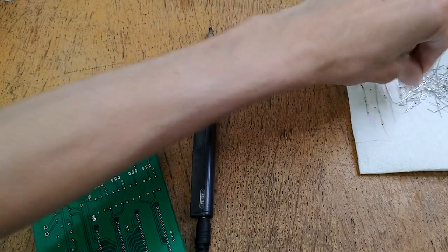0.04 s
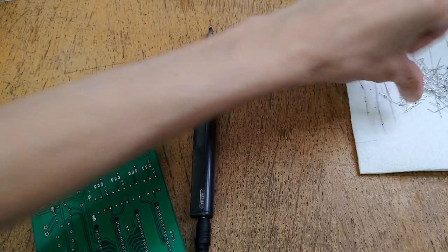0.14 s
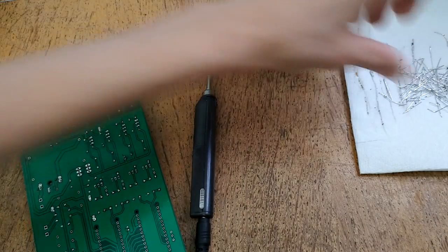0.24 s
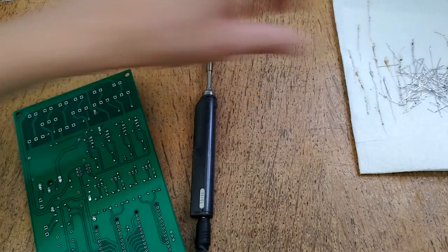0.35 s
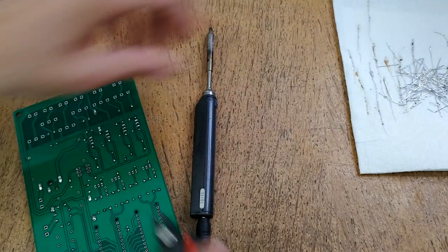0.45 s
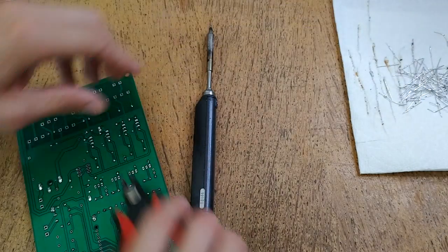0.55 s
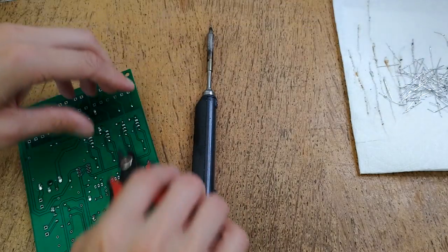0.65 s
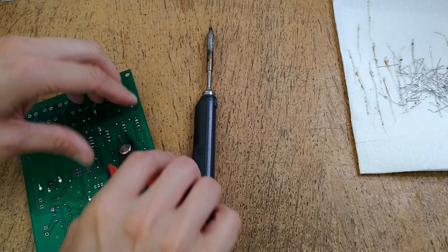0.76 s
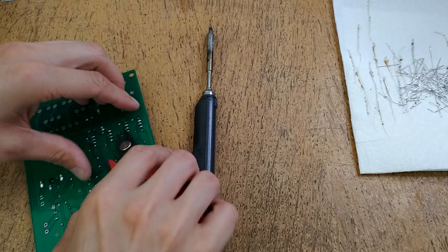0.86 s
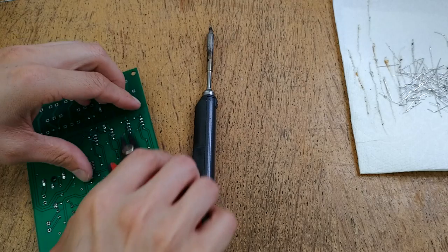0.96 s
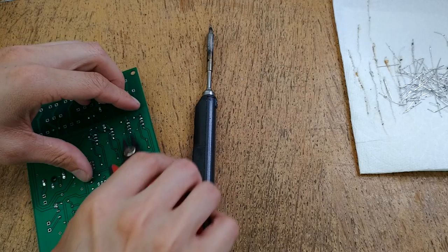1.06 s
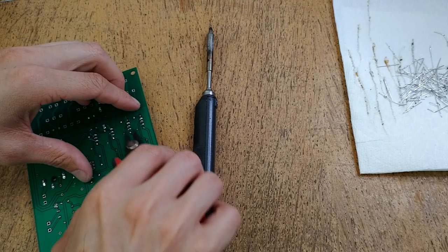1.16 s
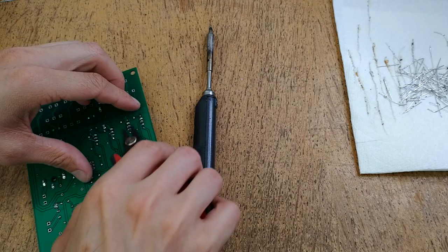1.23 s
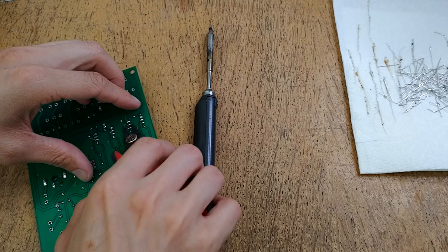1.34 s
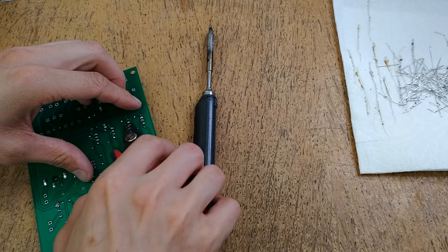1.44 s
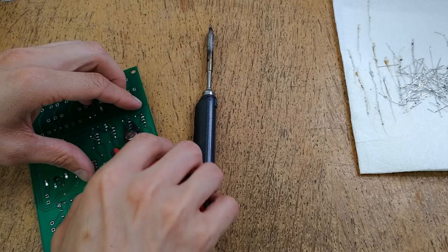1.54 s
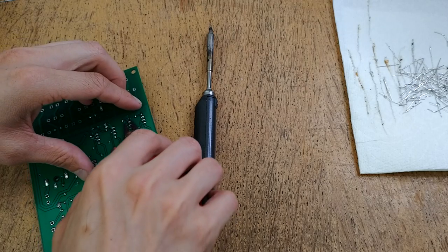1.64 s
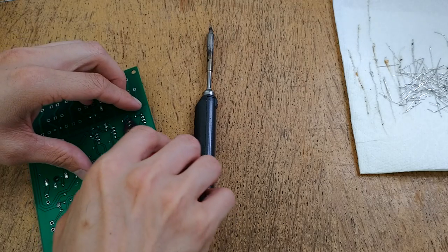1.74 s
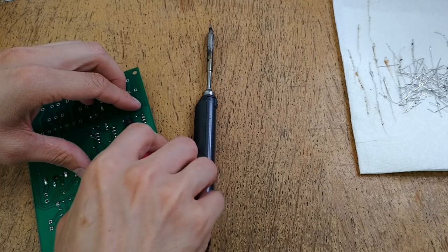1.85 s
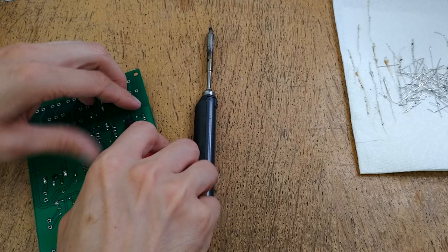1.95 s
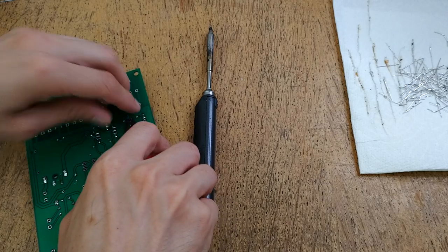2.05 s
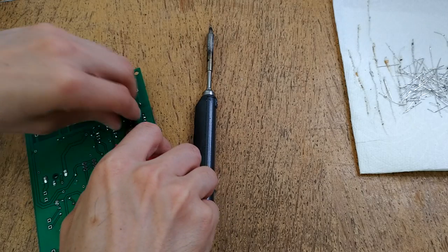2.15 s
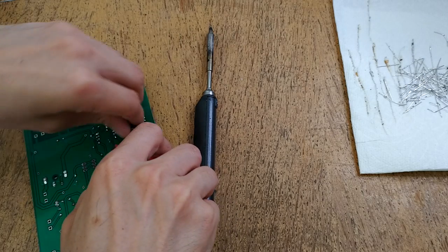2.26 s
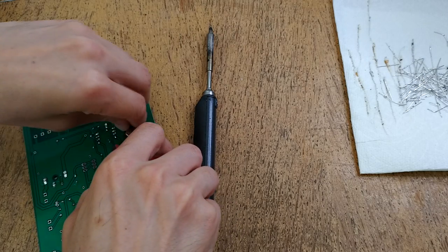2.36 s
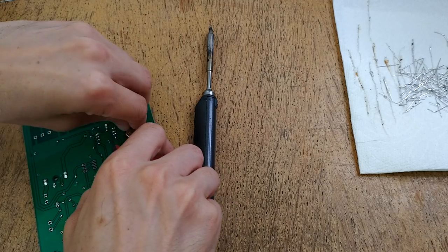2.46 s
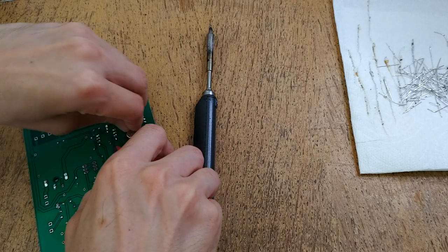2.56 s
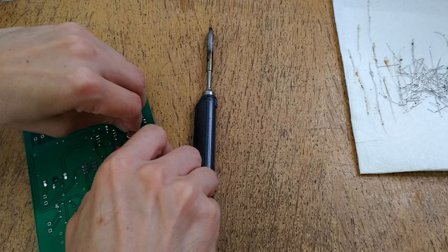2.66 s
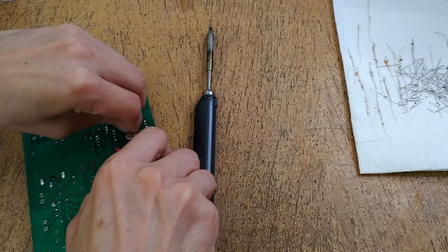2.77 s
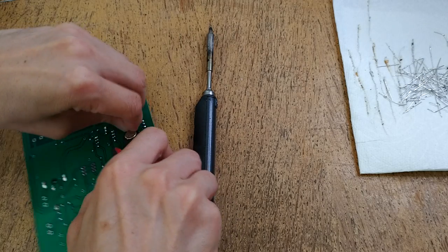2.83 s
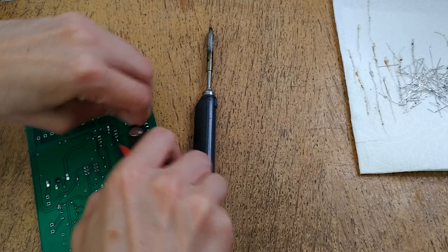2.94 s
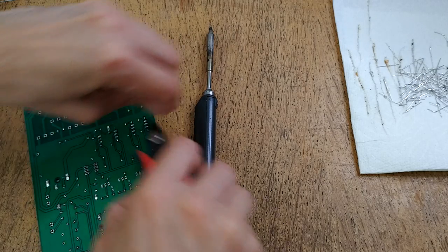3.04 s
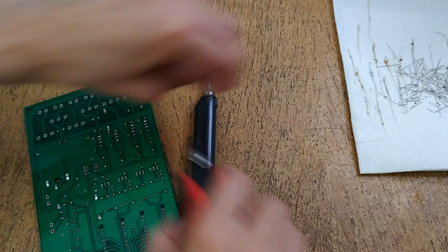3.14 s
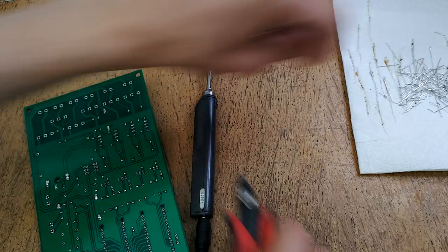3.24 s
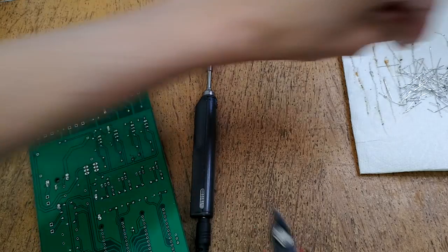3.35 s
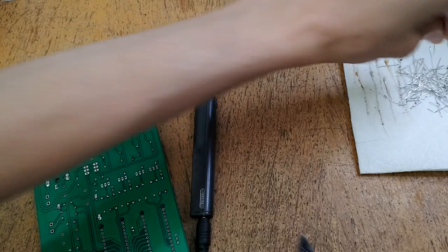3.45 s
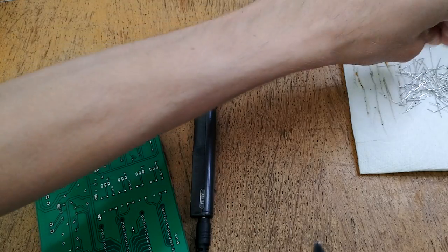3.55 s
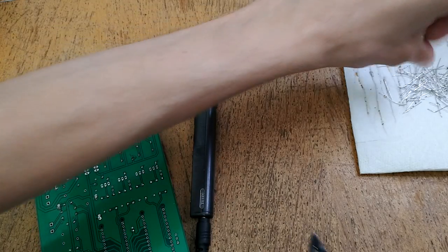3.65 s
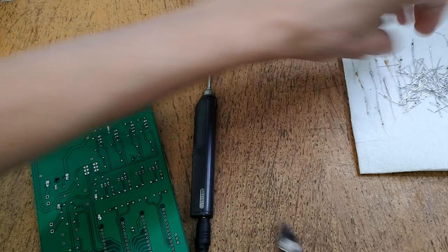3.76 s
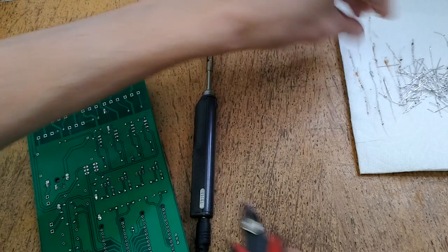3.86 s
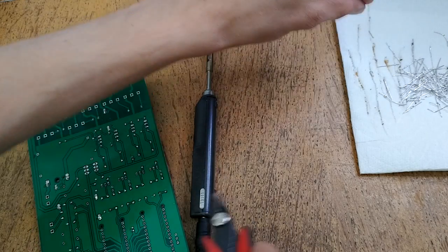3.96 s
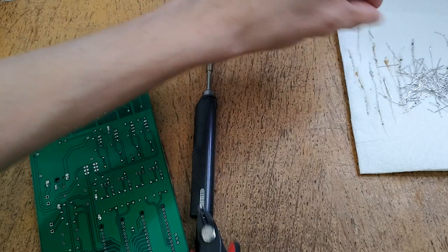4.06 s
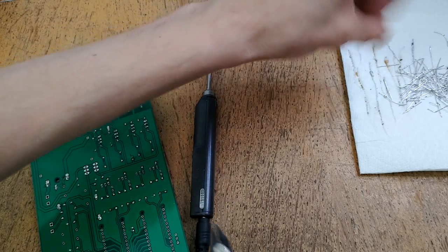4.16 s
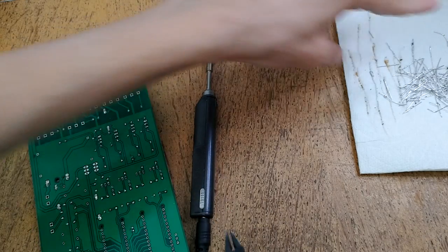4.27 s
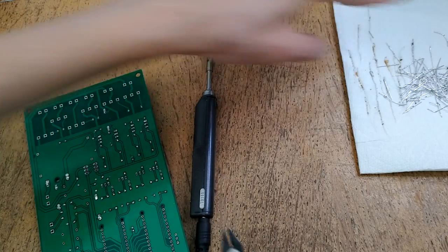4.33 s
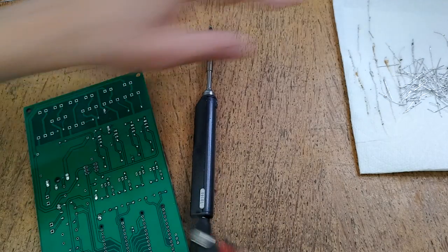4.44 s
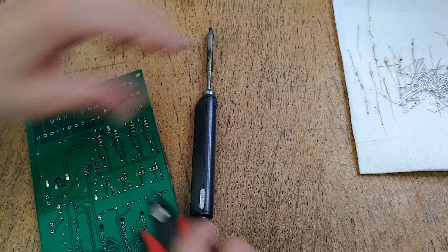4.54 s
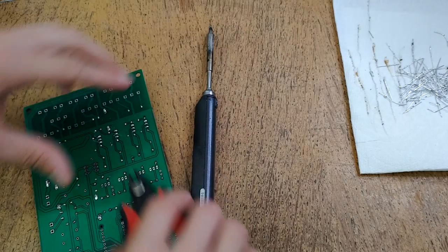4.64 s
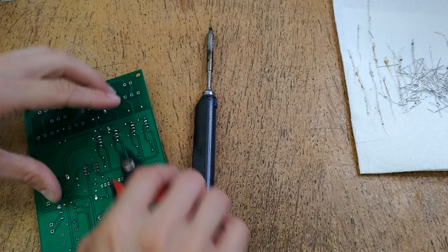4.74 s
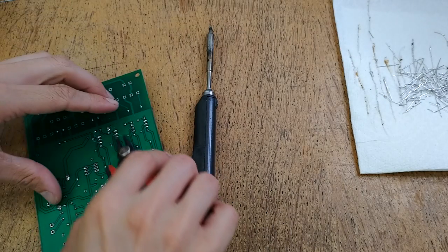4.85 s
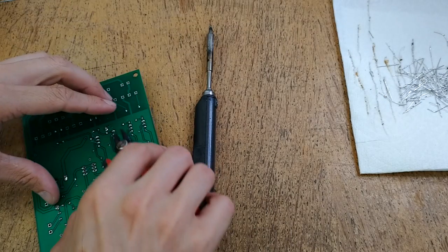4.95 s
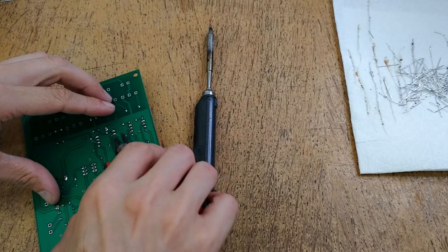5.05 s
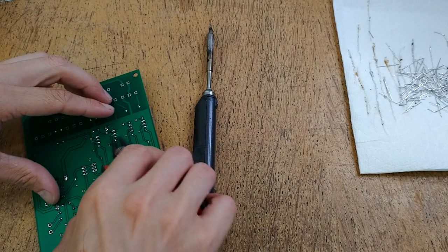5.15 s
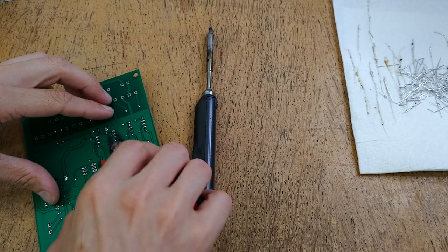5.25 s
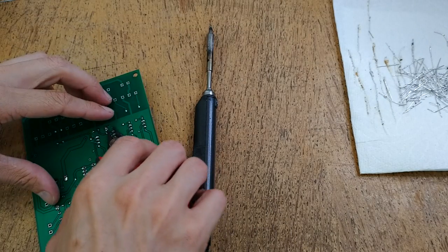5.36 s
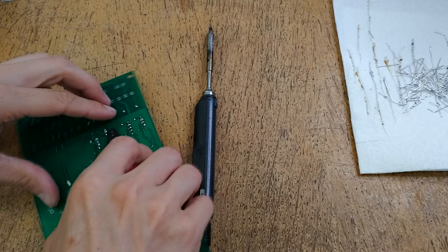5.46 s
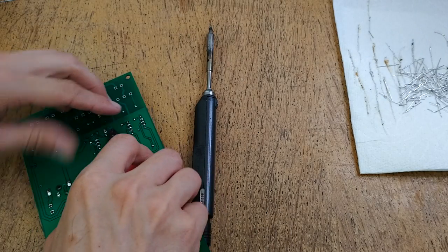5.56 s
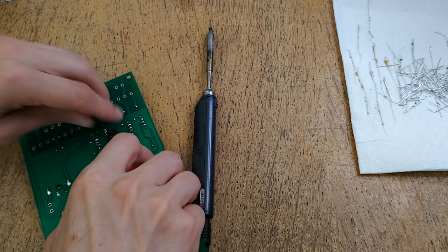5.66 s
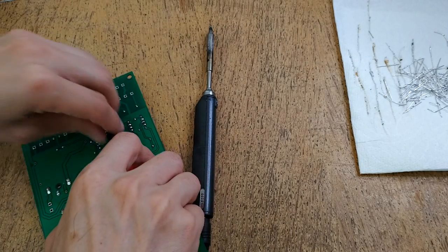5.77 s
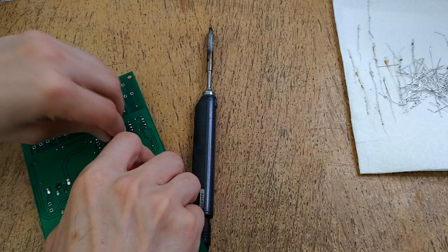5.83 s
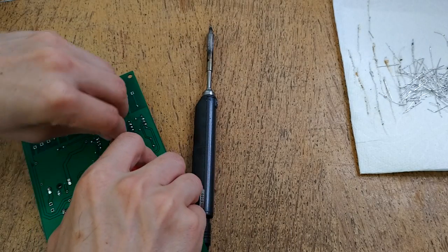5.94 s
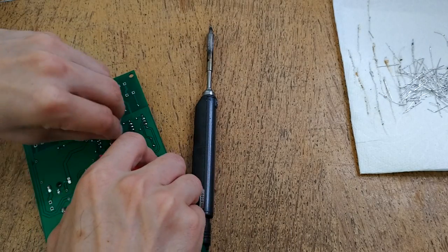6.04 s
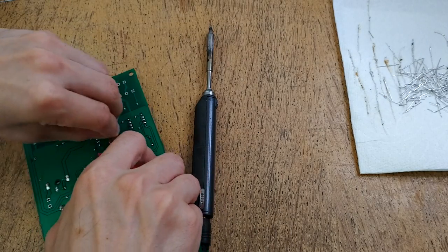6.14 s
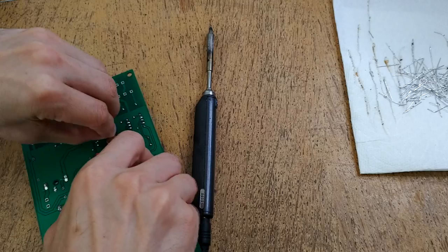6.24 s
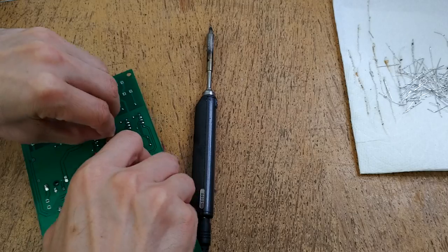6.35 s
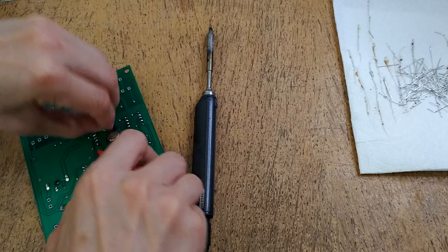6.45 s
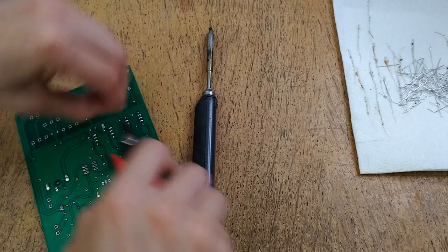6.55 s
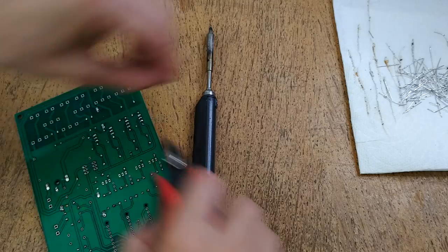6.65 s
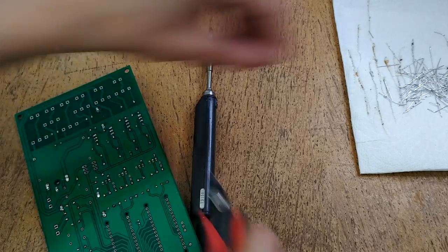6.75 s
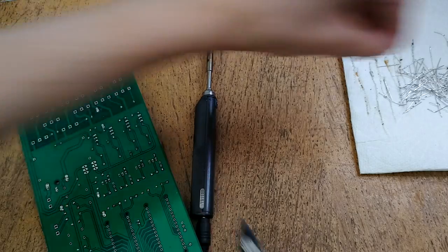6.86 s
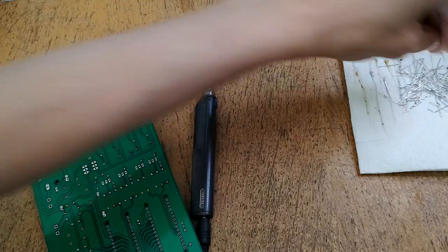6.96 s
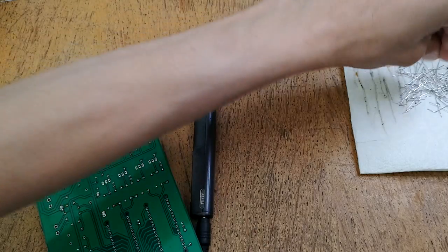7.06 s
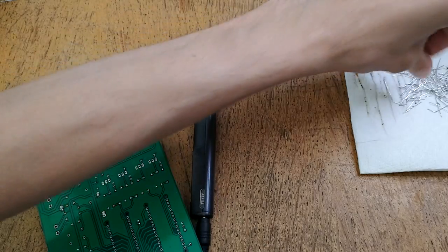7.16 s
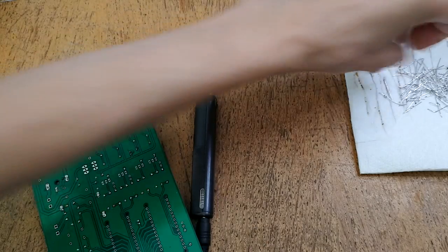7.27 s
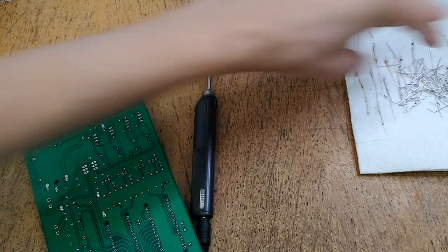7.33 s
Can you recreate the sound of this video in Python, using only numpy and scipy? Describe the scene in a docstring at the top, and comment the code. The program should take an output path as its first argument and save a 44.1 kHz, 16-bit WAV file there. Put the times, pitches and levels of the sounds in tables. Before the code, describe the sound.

Crisp metallic clips and rattling bounces on a wooden bench, light jaw ticks and finger rustles between, over a soft mains hum.

```python
"""Snipping leads off a circuit board

Flush cutters snip wires on a wooden bench: bursts of force ring the steel, the hollow under the board and
the board itself, which springs back and clatters. Between cuts the jaws tick on solder joints.
Fingers rub cut wires over paper, made of dense random slips; faint narrow tones of filtered noise ring and fade.
Wavering motor and mains tones and a soft noise of air and hiss lie behind, in a small echoing room."""
import sys
import numpy as np
from scipy import signal
from scipy.io import wavfile

SR = 44100
rng = np.random.default_rng(int(sys.argv[2]) if len(sys.argv) > 2 else 0)


def wav_out(sig):
    """Save sig, one row per channel (or a flat mono array), as 16-bit PCM at SR to the path in sys.argv[1]."""
    wavfile.write(sys.argv[1], SR, np.round(np.clip(np.atleast_2d(sig).T, -1, 1) * 32767).astype(np.int16))


N = 326340   # length in samples

# Room air and microphone hiss. Each row: frequency in Hz, relative level in dB per Hz.
AIR = [(25, -24.5), (45, -18), (80, -6.5), (140, 5), (230, -1.5), (330, -9.5), (700, -12.5), (1300, -18.5),
       (2300, -22), (3300, -31.5), (5000, -32), (7500, -27), (10000, -38.5), (15000, -38)]
AIR_DB = -57.5   # overall level
CUTOFF_HZ = 16350   # from here up the sound is at least 60 dB down

# Motor and mains tones, one entry per tone: frequency in Hz, middle level in dB rms, spread of the waver in dB.
HUM_HZ = [29.39, 51.89, 58.78, 117.57, 120.0, 137.3, 176.3, 235.14, 374.3]
HUM_DB = [-79, -66, -64.5, -74, -55, -60, -75.5, -70.5, -74.5]
HUM_WAVER_DB = [.7, 1, .6, .7, 0.73, 3, 1.2, 1.2, 0.66]

# How the room dies away. Each row: frequency in Hz, time to fall 60 dB in seconds, level in dB before WET_DB.
ROOM_DECAY = [(254.7, 0.67, -17), (600, 0.8, -17), (1380, 0.36, -15.5), (2500, 0.61, -15),
              (5200, 0.44, -22), (9250, 0.21, -28), (15130, 0.068, -21.5)]
EARLY_T60_S, EARLY_DB = 0.22, 2.5   # dense reflections off nearby surfaces, level against the tail
WET_DB = -15   # level of the whole room response
BENCH_ECHO_S, BENCH_ECHO_DB = 0.0042, -8

# Resonances of each part. Each row: frequency in Hz, width in Hz, level in dB against the other rows.
WIRE_MODES = [(5430, 400, -5.5), (6100, 780, -4), (6850, 310, 2), (7800, 360, 0.5), (8000, 280, 0)]
FINGER_MODES = [(9400, 2200, 2.5), (11700, 900, -7.5), (12245, 900, -7), (14430, 2700, -1)]
JAW_MODES = [(3420, 1400, -4), (4180, 350, 2.5), (5234, 270, -3.5)]
STEEL_MODES = [(6085, 450, -9), (6870, 390, -3.5), (8310, 670, 2), (8680, 360, -2.5), (9407, 360, -3.5)]
EDGE_MODES = [(10800, 990, 1), (12000, 900, -1.5), (12400, 1400, -1.5), (15360, 3300, -5.5)]
HOLLOW_MODES = [(1947, 190, 3.5), (2250, 200, -3.5), (2428, 200, -12.5)]
KNOCK_MODES = [(1090, 120, -3), (1321.6, 93, 1), (1518, 65, 0), (1816, 120, -3)]
BOARD_MODES = [(247.4, 23, -2.5), (290, 55, -2), (375, 55, 1), (567, 29, 0), (680, 35, -4.5),
               (834, 29, -2.5)]
# Slender parts of the cutter that ring on after a touch.
# Each row: frequency in Hz, width in Hz, level in dB against the snap.
PING_MODES = [(2030, 44, -27.5), (2620, 60, -25), (4280, 92, -34.5), (5020, 60, -32), (5320, 190, -30),
              (6440, 70, -26.5), (6500, 130, -27.5), (7100, 220, -30), (7810, 64, -21.5),
              (8350, 170, -22.5), (8830, 88, -24.5), (9920, 100, -24.5)]

# Strokes of the hands. Each row: loudest moment in seconds, fading time in seconds, then the levels in dB
# of wire on paper, fingertips, and dragging jaws and board.
STROKES = [(0.15, 0.033, -64, -80, -81), (0.198, 0.053, -70, -62.5, -78), (0.295, 0.017, -63.5, -71, -83),
           (0.99, 0.016, -63, -84, -78), (1.046, 0.05, -66.5, -76, -78), (1.46, 0.18, -73, -92, -74),
           (1.614, 0.04, -70, -91, -78), (1.75, .1, -84, -92, -77.5), (2.42, 0.025, -79, -79, -69),
           (2.755, 0.039, -66, -81, -62), (3.331, .15, -67, -88.5, -62), (3.5, 0.12, -65.5, -80.5, -70),
           (3.614, 0.037, -56, -62.5, -80), (3.747, .05, -65, -54.5, -85), (3.8, 0.047, -68.5, -81, -79),
           (3.908, .04, -71, -78, -79.5), (4.234, 0.046, -84, -74.5, -81.5), (4.338, .05, -67, -71, -82.5),
           (5.014, 0.15, -60, -73, -63.5), (5.188, 0.031, -67.5, -83.5, -81), (5.42, 0.046, -75, -80, -72),
           (5.498, .03, -66.5, -81.5, -60.5), (5.623, 0.035, -54.5, -60.5, -68),
           (5.646, 0.012, -63, -54.5, -59.5), (5.7, .15, -72, -86, -78), (6.8, 0.3, -73.5, -84, -72),
           (7.108, 0.046, -67, -63, -82.5), (7.228, 0.03, -71, -63.5, -80), (7.282, 0.084, -70, -61, -70)]
RUB_FADE_DB, RUB_RISE_S = -21.5, 0.018   # level lost over the fading time; the swell climbs as much in RUB_RISE_S
RUB_FLUTTER_DB, SLIP_SPREAD_DB = 2.5, 2.5   # unevenness of the pressure, and of single slips
DRAG_PING_DB = -7   # dragging also sets the slender parts ringing

# Faint narrow-band tones that start quickly and fade. Each row: start in seconds,
# time to lose 20 dB in seconds, frequency in Hz, level in dB rms before the swell and fade.
FAINT_TONES = [(1.096, 0.04, 1180, -59), (2.49, 0.04, 680, -55), (3.444, 0.22, 2390, -65),
               (3.446, 0.17, 2720, -66), (3.464, .4, 3730, -72.5), (3.455, 0.27, 4880, -64.5),
               (3.46, 0.15, 6100, -63), (3.445, 0.15, 7150, -62.5), (4.261, 0.28, 3970, -76),
               (4.394, 0.13, 2250, -69.5), (4.993, 0.17, 5320, -70), (5.073, 0.037, 4280, -62),
               (5.076, 0.059, 1090, -55), (5.157, 0.079, 1700, -65), (5.428, 0.19, 1240, -60),
               (7.138, 0.21, 4110, -72), (7.162, 0.094, 600, -56), (7.25, 0.15, 890, -57),
               (7.249, 0.03, 1700, -52)]
FAINT_TONE_WIDTH_HZ, FAINT_TONE_RISE_S = 65, 0.008

# The jaws tick on solder joints.
# Each row: start in seconds, steel snap in dB before TICK_SNAP_DB, hollow ring in dB.
TICKS = [(0.974, -47.5, -57), (1.089, -55, -44), (1.117, -46, -47), (1.612, -57, -55), (1.633, -66, -48.5),
         (1.682, -64, -59), (1.741, -70, -60), (1.952, -38, -59), (2.038, -55, -71.5), (2.392, -41.5, -52),
         (2.403, -48, -55), (2.625, -37.5, -41.5), (2.733, -50, -46.5), (4.976, -48.5, -59.5),
         (4.992, -52, -54), (5.007, -43, -44), (5.03, -45.5, -39.5), (5.053, -54.5, -48.5),
         (5.095, -46.5, -62), (5.116, -59, -62), (5.191, -58, -61), (5.497, -54.5, -54.5),
         (6.052, -46, -54.5), (7.258, -70.5, -51.5)]
# Cutter and board bounce and clatter on the bench.
# Each row: start in seconds, then the peaks of steel snap, hollow ring and board thud in dB.
BOUNCES = [(1.36, -33.5, -38.5, -36), (1.433, -73, -45, -64), (2.8826, -11, -33, -32.5),
           (3.0025, -31, -32.5, -56), (3.039, -18.5, -8, -20.5), (3.043, -15, -32, -26),
           (3.065, -9.5, -24, -23.5), (3.069, -16, -37, -29.5), (3.088, -32, -12.5, -26.5),
           (3.1, -16.5, -34, -30), (3.106, -16.5, -25, -38), (3.126, -33, -26, -31.5),
           (3.131, -28, -44, -42), (3.149, -23.5, -28.5, -38.5), (3.166, -44, -27.5, -35),
           (3.172, -54, -28, -47), (3.182, -57, -31.5, -42), (6.447, -10.5, -40, -35),
           (6.5552, -24, -24, -29.5), (6.5659, -11, -40, -42), (6.571, -9.5, -45, -27.5),
           (6.581, -43, -25, -34), (6.5884, -39, -20, -27), (6.594, -42, -26, -36), (6.6, -23, -37, -34.5),
           (6.604, -21, -35, -30.5), (6.622, -44, -32.5, -32.5)]
# The jaws bite through wire. Each row: start in seconds, then the peaks of steel snap, hollow ring and
# board thud in dB, length in milliseconds, jaw clack in dB, knock in dB.
SNIPS = [(1.322, -25.5, -25, -37.5, 5, -34, -40.5), (2.8614, -5.5, -16, -35.5, 2.3, -18.5, -28),
         (5.337, -23.5, -27, -35, 4.3, -39, -32), (6.4294, -4.5, -16, -35, 2.4, -15.5, -29.5)]
BOUNCE_MS, TICK_MS = 1.4, 2.3   # set how long the force lasts
TICK_THUD_DB = -10.5   # a tick barely moves the board: thud against hollow ring
TICK_PING_DB, TICK_SNAP_DB = 3.5, -3   # a light tick is more ring than snap

# Colour of a contact. Each list: level in dB for a bounce, a tick and, in the edge list only, a snip.
CLACK_UNDER_SNAP_DB = [-21, -17]
CLACK_UNDER_RING_DB = [-16.5, -16.5]
EDGE_UNDER_SNAP_DB = [-10, -19, -9.5]
KNOCK_DB, KNOCK_FOLLOWS_RING = [1, -5.5], 0.51   # the knock is set between ring and thud, then shifted


def amp(db):
    """Turn decibels into a plain gain."""
    return 10 ** (np.asarray(db) / 20)


def rms_one(x):
    """Scale a sound to an average strength (rms) of 1."""
    return x / np.sqrt(np.mean(x ** 2) + 1e-20)


def at_hz(table, hz):
    """Read the columns of a table at one frequency, between rows on a log-frequency axis."""
    f, *columns = np.transpose(table)
    return [np.interp(np.log(hz), np.log(f), column) for column in columns]


def drift(rate_hz):
    """Slow random wandering of spread 1: smoothed noise made at every 40th sample, then filled in."""
    r = np.exp(-2 * np.pi * rate_hz / (SR / 40))
    noise = rng.standard_normal(N // 40 + 4002)
    slow = signal.lfilter([1], [1, -2 * r, r * r], noise)[4000:]   # skip the filter's start
    return np.interp(np.arange(N) / 40, np.arange(len(slow)), rms_one(slow - slow.mean()))


def body(x, modes):
    """A solid part shaken by x: resonances side by side, with alternating signs."""
    out = 0
    for k, (hz, width_hz, level_db) in enumerate(modes):
        r = np.exp(-np.pi * width_hz / SR)   # a narrower resonance rings longer
        poles = [1, -2 * r * np.cos(2 * np.pi * hz / SR), r * r]
        zeros = [(1 - r * r) / 2, 0, (r * r - 1) / 2]
        ring = signal.lfilter(zeros, poles, x + 1e-18)
        out = out + (-1) ** k * amp(level_db) * ring
    return out


def soften(x, edge_hz):
    """A soft contact loses the treble above its edge frequency."""
    return signal.sosfilt(signal.butter(2, edge_hz, fs=SR, output="sos"), x)


def bands(length):
    """Third-octave bands of white noise, neighbours unrelated: pairs of centre in Hz and noise."""
    edges = 20 * 2 ** (np.arange(30) / 3)
    white = rng.standard_normal((2, length))
    for k, (low, high) in enumerate(zip(edges, edges[1:])):
        sos = signal.butter(2, [low, high], "band", fs=SR, output="sos")
        yield np.sqrt(low * high), signal.sosfilt(sos, white[k % 2])


def air():
    """Room air and hiss: smooth noise, each band flickering a little."""
    out = 0
    for hz, noise in bands(N):
        level_db = at_hz(AIR, hz)[0]
        out = out + noise * amp(level_db + 0.8 * drift(6))
    return amp(AIR_DB) * rms_one(out)


def hum():
    """Motor and mains tones of steady pitch whose levels waver."""
    t, out = np.arange(N) / SR, 0
    for hz, level_db, waver_db in zip(HUM_HZ, HUM_DB, HUM_WAVER_DB):
        tone = np.sqrt(2) * np.sin(2 * np.pi * (hz * t + rng.random()))
        out = out + amp(level_db + waver_db * drift(1.8)) * tone
    return out


def room(x):
    """Reflections in the room: a quick early cloud and a tail that dies band by band."""
    t = np.arange(SR // 2) / SR
    response = np.zeros(len(t))
    early = amp(EARLY_DB - 60 * t / EARLY_T60_S)
    for hz, noise in bands(len(t)):
        t60, level_db = at_hz(ROOM_DECAY, hz)
        response += noise * amp(level_db) * (amp(-60 * t / t60) + early)
    build_up = 1 - np.exp(-t / 0.0014)
    return signal.fftconvolve(x, response * build_up * amp(WET_DB))[:N]


def bench(x):
    """The sound plus one echo off the bench top."""
    lag = round(BENCH_ECHO_S * SR)
    return x + amp(BENCH_ECHO_DB) * np.pad(x, (lag, 0))[:N]


def faint_tones():
    """Noise held in one narrow resonance; it sets in quickly and loses 20 dB over its length."""
    out, t = np.zeros(N + SR), np.arange(SR // 2) / SR
    for s, length_s, hz, level_db in FAINT_TONES:
        noise = rng.standard_normal(SR)
        narrow = body(noise, [(hz, FAINT_TONE_WIDTH_HZ, 0)])
        tone = rms_one(body(narrow, [(hz, 5.7 * FAINT_TONE_WIDTH_HZ, 0)]))
        swell = (1 - np.exp(-t / FAINT_TONE_RISE_S)) * amp(-20 * t / length_s)
        # the last half second is used, when the resonance has settled
        out[round(s * SR):][:len(swell)] += amp(level_db) * swell * tone[-len(swell):]
    return out[:N]


def strokes():
    """Each stroke of the hand swells and fades; gives gains for wire, fingertips and dragging."""
    t, out = np.arange(N) / SR, np.zeros((3, N))
    for s, fade_s, *levels_db in STROKES:
        away = np.maximum((t - s) / fade_s, (s - t) / RUB_RISE_S)
        out += amp(levels_db)[:, None] * amp(RUB_FADE_DB * np.minimum(away, 10))
    return out


def rubbing():
    """Rubbing is dense uneven slips, fine under wire and fingertips, sparser under the dragging jaws."""
    wire, fingers, drag = strokes()
    # gain over time, what rings, slips per second
    layers = [(wire, WIRE_MODES, 8000), (fingers, FINGER_MODES, 12000),
              (drag, HOLLOW_MODES + KNOCK_MODES, 700), (drag * amp(DRAG_PING_DB), PING_MODES, 300)]
    out = 0
    for gain, modes, per_s in layers:
        happens = rng.random(N) < per_s / SR
        strength = amp(SLIP_SPREAD_DB * rng.exponential(1, N))
        slips = happens * strength * rng.choice([-1, 1], N)
        flutter = amp(RUB_FLUTTER_DB * drift(30))
        out = out + gain * flutter * rms_one(body(slips, modes))
    return out


def touches():
    """List all contacts, filling in the parts of their colour that follow from snap, ring and thud.
    Each row: start in seconds, clack, snap, edge, ring, knock and thud in dB, length in ms, ping in dB."""
    rows = [row + (BOUNCE_MS,) for row in BOUNCES]
    rows += [row + (row[2] + TICK_THUD_DB, TICK_MS) for row in TICKS]
    kind = np.repeat([0, 1, 2], [len(BOUNCES), len(TICKS), len(SNIPS)])
    light = kind[:len(rows)]   # bounces and ticks only: snips bring their own clack and knock
    _, snap, ring, thud, _ = np.transpose(rows)
    clack = np.maximum(snap + np.take(CLACK_UNDER_SNAP_DB, light), ring + np.take(CLACK_UNDER_RING_DB, light))
    knock = thud + KNOCK_FOLLOWS_RING * (ring - thud) + np.take(KNOCK_DB, light)
    every = np.vstack([np.column_stack([rows, clack, knock]), SNIPS])
    s, snap, ring, thud, length_ms, clack, knock = every.T
    edge = snap + np.take(EDGE_UNDER_SNAP_DB, kind)
    ping = snap + TICK_PING_DB * (kind == 1)
    snap = snap + TICK_SNAP_DB * (kind == 1)
    return np.transpose([s, clack, snap, edge, ring, knock, thud, length_ms, ping])


def pings():
    """Every contact strikes each slender part of the cutter with a random strength and direction."""
    table, out = touches(), 0
    at = np.round(table[:, 0] * SR).astype(int)
    for hz, width_hz, level_db in PING_MODES:
        luck = rng.standard_normal(len(table))
        clicks = np.zeros(N)
        clicks[at] = amp(table[:, 8]) * luck * SR / (np.pi * width_hz)
        ring = body(clicks, [(hz, width_hz, level_db)])
        out = out + body(ring, [(hz, 600, 0)])   # the ring builds up over a moment
    return out


def contacts():
    """Each contact is a short dying burst of force that shakes the steel, the hollow and the board.
    Gives the close sound and what spreads into the room, where many directions even out the colour."""
    table, lag_ms = touches(), np.arange(1500) / SR * 1000
    grit = rng.standard_normal((len(table), 1500))   # shared by all the parts
    at = np.round(table[:, :1] * SR).astype(int) + np.arange(1500)
    length_ms = np.clip(table[:, [7]], 0.2, 8)
    # what rings, first blunt blow, stretch of the length, softness edge in Hz, level into the room in dB
    parts = [(JAW_MODES, 1.5, 1.1, 9000, 0.1), (STEEL_MODES, 0.6, 1.1, 15000, 0.1),
             (EDGE_MODES, 0.6, 0.8, 19000, 0.1), (HOLLOW_MODES, 14.0, 0.8, 4000, -5),
             (KNOCK_MODES, 9.0, 1.5, 2400, 0.1), (BOARD_MODES, 25.0, 5.0, 1300, 2.5)]
    close, spread = 0, 0
    for column, (modes, blow, stretch, soft_hz, room_db) in enumerate(parts):
        dying = np.exp(-lag_ms / (stretch * length_ms))
        onset = 1 - np.exp(-lag_ms / 0.084)
        force = soften(grit * dying * onset + blow * (lag_ms == 0), soft_hz)
        # scale so that the ringing peaks at the level in the table
        peak = np.abs(body(force, modes)).max(axis=1, keepdims=True)
        force *= amp(table[:, [column + 1]]) / peak
        track, clicks = np.zeros((2, N + 1500))
        np.add.at(track, at, force)
        close = close + body(track[:N], modes)
        # for the room: the same energy at once, into wider resonances
        clicks[at[:, 0]] = np.sqrt(np.sum(force ** 2, axis=1)) * np.sign(grit[:, column])
        clicks = soften(clicks + 1e-18, soft_hz)
        wide = [(hz, 2.0 * width_hz, level_db) for hz, width_hz, level_db in modes]
        spread = spread + amp(room_db) * body(clicks[:N], wide)
    return close, spread


def scene():
    """Add the background, the hands and the cutter, with the bench echo and the room."""
    close, spread = contacts()
    rubs = rubbing()
    near = bench(close + rubs + faint_tones())
    mix = near + room(spread + rubs) + hum() + air() + pings()
    return mix[None]   # one channel


def record(dry):
    """Cut the top of the treble steeply."""
    return signal.sosfilt(signal.cheby2(16, 60, CUTOFF_HZ, fs=SR, output="sos"), dry)


dry = scene()
out = record(dry)
wav_out(out)
```